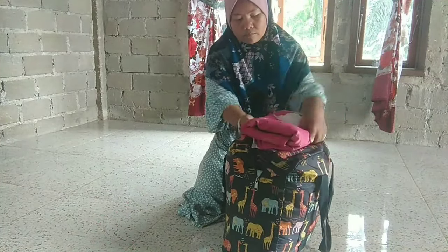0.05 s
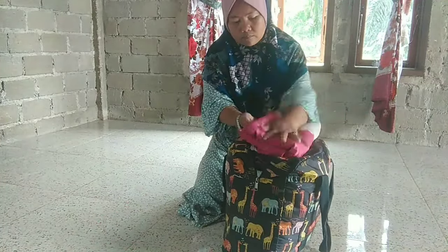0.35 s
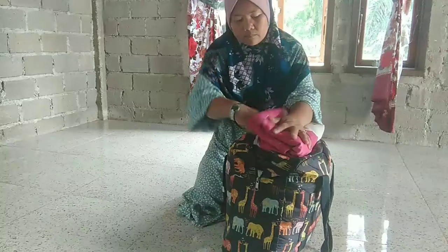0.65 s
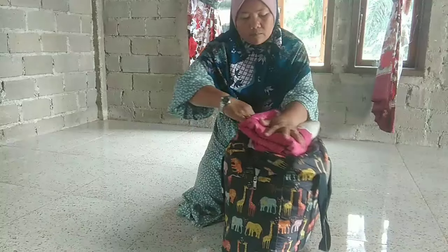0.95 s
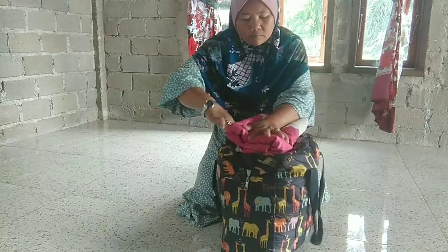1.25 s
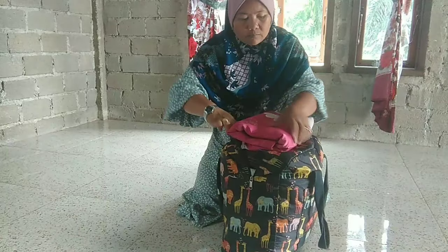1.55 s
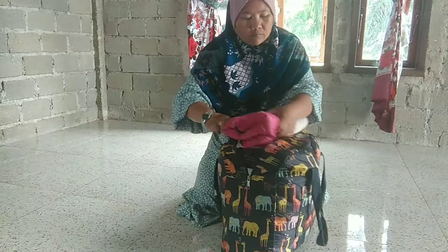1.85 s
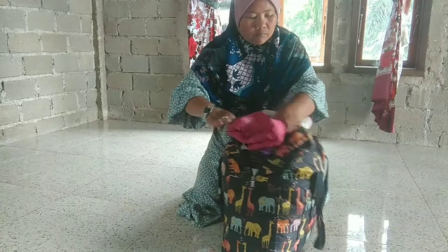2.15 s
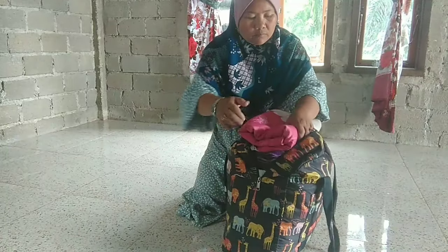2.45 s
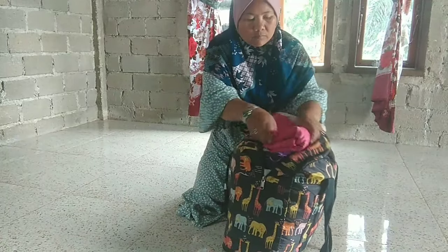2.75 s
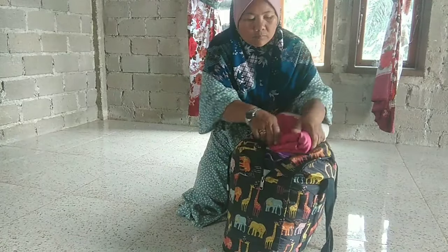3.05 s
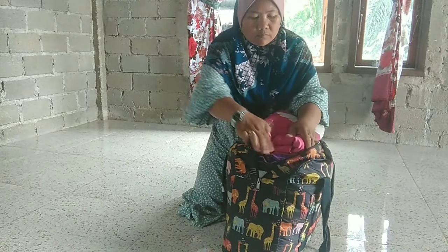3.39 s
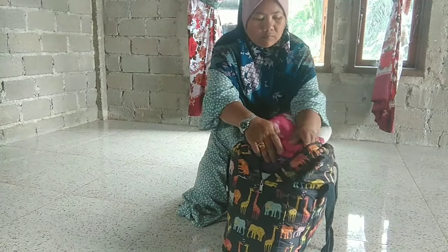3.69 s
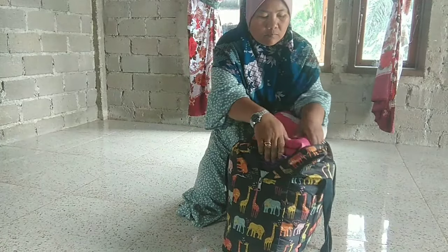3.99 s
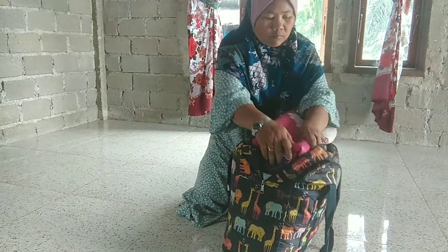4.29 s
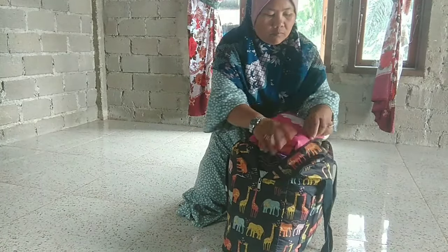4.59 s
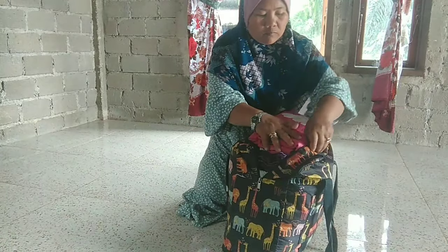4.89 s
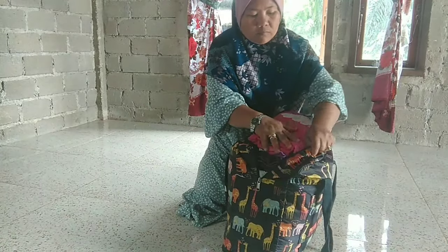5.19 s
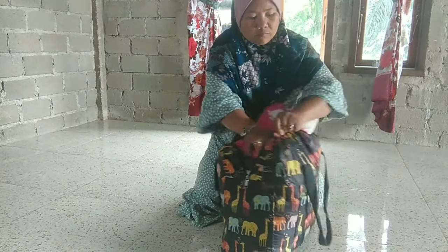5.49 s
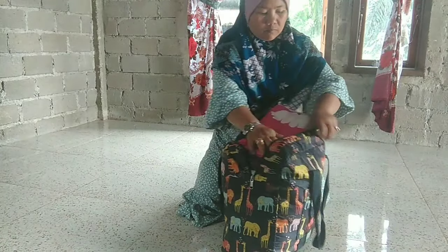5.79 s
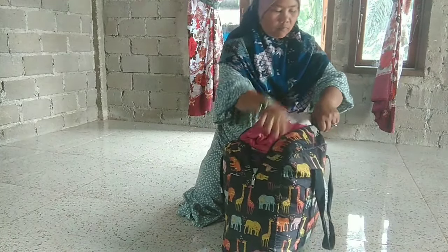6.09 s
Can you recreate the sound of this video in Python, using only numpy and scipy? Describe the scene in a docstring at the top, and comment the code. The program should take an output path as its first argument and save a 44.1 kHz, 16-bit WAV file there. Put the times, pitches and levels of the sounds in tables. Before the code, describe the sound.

Hands stuff clothes into a packed fabric bag, cloth sliding and scraping between dull pats and small clicks in a bare room.

```python
"""A swish of cloth and a soft thump: folded clothes are pressed by hand into a full fabric backpack.
Cloth slides in dense fibre slips, the stiff shell scrapes, and the stuffed bag resonates when pushed.
Zip pulls click, pats crush the creases and fingers tap the taut panels, over quiet air and a thin whine.
The bag stands on the tiled floor of a bare brick room, whose hard walls ring for half a second."""
import sys
import numpy as np
from scipy import signal
from scipy.fft import rfft, irfft
from scipy.io import wavfile
from scipy.ndimage import uniform_filter1d, map_coordinates

SR = 44100
rng = np.random.default_rng(int(sys.argv[2]) if len(sys.argv) > 2 else 0)


def wrap_up_sound(samples):
    """Save the sound to the file named by the first command line argument, as 16-bit audio."""
    columns = np.atleast_2d(samples).T
    # keep every value between -1 and 1, then stretch to whole-number steps
    tamed = np.clip(columns, -1, 1)
    steps = np.round(tamed * 32767).astype(np.int16)
    wavfile.write(sys.argv[1], SR, steps)


N = 279575
TIME = np.arange(N) / SR
# spectrum of coarse fabric as it scrapes or creases: frequency_hz, gain_db
COARSE_FABRIC_SPECTRUM = [(250, -15), (520, -29), (720, -3.5), (920, 0.5), (1250, -1), (1550, -5),
                          (1950, 2), (2400, -7), (3000, -10), (4000, -23), (12000, -44.5)]


def undb(db):
    """Decibels to amplitude ratio."""
    return 10 ** (np.asarray(db) / 20)


def unit(x):
    """Normalise to rms 1."""
    return x / np.sqrt(np.mean(x ** 2))


def convolve(x, response):
    """Linear filtering by an impulse response, keeping the sound's length."""
    return signal.fftconvolve(x, response)[:len(x)]


def colour(x, spectrum, size=4096):
    """Minimum-phase filtering to an outline of frequency_hz, gain_db."""
    hz, db = np.transpose(spectrum)
    gain = undb(np.interp(np.log(np.fft.rfftfreq(size, 1 / SR) + 1), np.log(hz), db))
    cepstrum = irfft(np.log(gain))
    cepstrum[1:size // 2] *= 2
    cepstrum[size // 2 + 1:] = 0
    return convolve(x, irfft(np.exp(rfft(cepstrum))))


def walk(rate_hz):
    """Random modulation: a smooth wander of rms 1."""
    step = max(int(SR / rate_hz), 1)
    stairs = np.repeat(rng.standard_normal(N // step + 1), step)
    return unit(uniform_filter1d(stairs, step)[:N])


def add(track, start_s, sound, peak_db):
    """Superposition: mix a sound in at a time and a peak level."""
    i = max(int(start_s * SR), 0)
    track[i:i + len(sound)] += (undb(peak_db) * sound / np.abs(sound).max())[:N - i]


def slips(per_s, scatter_db):
    """Stick-slip friction: tiny releases at random moments and of uneven size."""
    happens = rng.random(N) < per_s / SR
    size = undb(scatter_db * np.minimum(rng.exponential(size=N), 4))
    return unit(happens * size * rng.choice([-1, 1], N))


def shimmer(x, rate_hz, depth_db, bands, size=1024, loud_db=60):
    """Spectral modulation: narrow bands swell and fade at random, less deeply when the sound is loud."""
    hz, frame_s, spectra = signal.stft(x, SR, nperseg=size)
    place = np.meshgrid(rate_hz * frame_s, bands * np.sqrt(hz / hz[-1]))
    swell = map_coordinates(rng.standard_normal((len(frame_s), bands + 1)), place, order=3, mode="nearest")
    loudness = 1 + np.linalg.norm(spectra, axis=0) / undb(loud_db)
    gain = undb(depth_db * np.clip(swell, -2, 1.5) / np.sqrt(loudness))
    gain /= np.sqrt(np.mean(gain ** 2, axis=0))
    return signal.istft(spectra * gain, SR, nperseg=size)[1][:N]


def gestures(starts, rises, holds, levels, release_s, sag_db_per_s):
    """Incoherent addition: movements sum in power; each rises, sags while held, then dies away."""
    power = np.zeros(N)
    for start_s, rise_s, hold_s, level_db in zip(starts, rises, holds, levels):
        i = max(int(start_s * SR), 0)
        t = TIME[:min(N - i, int(.7 * SR))]
        attack = np.sin(np.pi / 2 * np.minimum(t / max(rise_s, 1 / SR), 1)) ** 2
        release = np.exp(-np.maximum(t - rise_s - hold_s, 0) / release_s)
        power[i:i + len(t)] += (attack * release * undb(level_db - sag_db_per_s * t)) ** 2
    return np.sqrt(power)


def hand_strokes():
    """Common excitation: a hand slides, slows a little and stops, driving swish, rasp and scrape."""
    # strokes over cloth: start_s, rise_s, hold_s, swish_db, rasp_re_swish_db, scrape_re_swish_db
    strokes = [ (0.0, 0.0013, 0.028, -46.5, -0.5, 0.5), (0.081, 0.022, 0.045, -52.5, -6, -0.5),
               (0.348, .005, 0.036, -49.5, 9, 11.5), (0.457, .02, .15, -54.5, -1, -15),
               (0.628, 0.03, 0.011, -46.5, -2, -13.5), (0.774, 0.011, 0.022, -76, -12, 6.5),
               (0.861, 0.029, .015, -74.5, -8, -3.5), (1.036, 0.012, 0.1, -61, -20, -27),
               (1.128, 0.08, .06, -52, -5, -18.5), (1.46, 0.0071, .012, -62, -17, -8),
               (1.485, 0.025, .17, -62.5, -17.5, -25), (1.628, 0.023, 0.032, -68.5, 7.5, -13),
               (1.765, 0.038, 0.037, -56.5, -6, -2.5), (1.836, .002, 0.0066, -42.5, -9.5, -3),
               (1.93, 0.036, .05, -70, -23, -6.5), (2.12, .01, 0.065, -55, 3, -0.5),
               (2.217, .02, 0.041, -59, -9, -5), (2.317, .015, 0.016, -77.5, -4, -3),
               (2.374, 0.013, .04, -77.5, -0.5, 5), (2.547, .006, 0.044, -59.5, -27, -13),
               (2.597, 0.07, 0.38, -60.5, -19, -12), (2.665, 0.017, 0.017, -71.5, -4, -3),
               (2.833, 0.099, 0.03, -53.5, -3.5, 5.5), (3, .02, 0.066, -62, -11, -6),
               (3.065, .025, 0.011, -47, -18, -9.5), (3.145, 0.021, 0.073, -49.5, -6, -7.5),
               (3.288, 0.04, .02, -52, -7, -3.5), (3.357, 0.029, 0.027, -52.5, -10, -8),
               (3.436, 0.042, 0.19, -57.5, -18, -16), (3.53, .012, .012, -62, 2, 5),
               (3.583, .015, 0.059, -54.5, -12, 1.5), (3.67, .02, 0.23, -59, -18, -10),
               (3.758, 0.013, 0.01, -59.5, 2, 2), (3.877, 0.068, 0.04, -49, -6.5, -8),
               (4.053, 0.055, 0.07, -54, -9, -16.5), (4.19, 0.0066, 0.062, -59.5, -26, 0),
               (4.238, 0.043, 0.12, -59, -20, -16), (4.42, 0.039, .01, -57, -21, -17),
               (4.477, .03, 0.013, -49, -14, -8.5), (4.51, .05, 0.049, -54.5, -15, -4),
               (4.633, 0.029, 0.25, -61, -28, -20.5), (4.923, .025, .015, -61, -12, -9),
               (5.02, 0.071, 0.025, -47, -2, -11.5), (5.122, .02, 0.095, -57, -3, -13),
               (5.265, .005, .06, -48.5, 4.5, -1), (5.313, 0.1, 0.081, -39.5, -3, -6.5),
               (5.56, 0.075, 0.4, -45.5, -4.5, -6), (5.637, 0.023, 0.012, -46.5, -7, -2.5),
               (5.92, .035, .02, -47, -12, -26), (6.019, .05, 0.064, -45, -5.5, -6.5),
               (6.161, 0.042, 0.083, -58, -19, -39.5), (6.27, 0.063, .02, -45, -14.5, -28)]
    start_s, rise_s, hold_s, swish_db, rasp_db, scrape_db = np.transpose(strokes)
    return [gestures(start_s, rise_s, hold_s, swish_db + share_db, release_s=0.034, sag_db_per_s=9)
            for share_db in (0, rasp_db, scrape_db)]


def cloth_swish(speed, pressure):
    """Sliding friction of weave on weave: speed releases more fibres, pressure adds a coarser rasp."""
    # spectra of sliding fibres and of pressed weave: frequency_hz, gain_db
    swish_spectrum = [(1500, -36.5), (3800, -34.5), (5000, -7.5), (6200, -2), (7100, 1.5), (8100, 3.5),
                      (9200, 0), (10200, -7.5), (12000, -12), (15000, -36.5)]
    rasp_spectrum = [(1000, -28.5), (2000, -8), (2900, 1.5), (3500, -1), (4700, 0.5), (6000, -0.5),
                     (9000, -15), (12000, -21.5), (15000, -28)]
    fibres = slips(per_s=1200 + 7000 * np.sqrt(speed / speed.max()), scatter_db=-1.5)
    swish = unit(colour(fibres, swish_spectrum)) * speed * undb(-0.5)
    weave = unit(colour(slips(per_s=3000, scatter_db=2.0), rasp_spectrum))
    rasp = shimmer(weave, rate_hz=13, depth_db=2.5, bands=48) * pressure * undb(-1.2)
    return (swish + rasp) * undb(0.69 * walk(70))


def shell_scrape(drag):
    """Stick-slip on a rough surface: the coarse shell catches in fewer, larger slips."""
    catches = unit(colour(slips(per_s=900, scatter_db=2.5), COARSE_FABRIC_SPECTRUM))
    scrape = shimmer(catches, rate_hz=25, depth_db=1.5, bands=40)
    return scrape * drag * undb(-2.5 + 1.5 * walk(45))


def stuffing_shoves(width_hz=85):
    """Membrane resonance: packed clothes give way and ring the fabric wall at a pitch set by tension."""
    # shoves of the packed clothes: start_s, hold_s, level_db, pitch_hz
    shoves = [ (0.0, .012, -28, 186), (.085, 0.025, -54.5, 196), (.351, .025, -27, 228),
              (0.424, .04, -44, 230), (0.635, .04, -65, 380), (1.185, .02, -68.5, 335),
              (1.456, .02, -66.5, 220), (1.785, .05, -60, 238.8), (1.834, 0.028, -54, 131.5),
              (2.098, .015, -50, 258.7), (2.118, .035, -41.5, 220), (2.234, .02, -47.5, 205),
              (2.401, .06, -62.5, 248), (2.557, .055, -61.5, 220), (2.756, .02, -69, 170),
              (2.927, .04, -57, 186), (3.147, 0.068, -58, 310), (3.31, .03, -64, 253),
              (3.379, 0.012, -69.5, 157.3), (3.465, .05, -64, 360), (3.588, 0.028, -57.5, 400),
              (3.638, .02, -54, 220), (3.75, .06, -66, 278.5), (3.899, 0.071, -61, 205),
              (3.993, 0.043, -71, 382), (4.172, 0.083, -53.5, 301), (4.274, 0.046, -61, 211),
              (4.532, 0.056, -57.5, 200), (4.885, 0.034, -64, 350), (5.13, 0.094, -62, 295),
              (5.27, .12, -48.5, 230), (5.421, .04, -49.5, 266), (5.602, .03, -57.5, 217.3),
              (5.674, 0.038, -47.5, 206.4), (5.78, .06, -56, 320), (6.037, .02, -50.5, 339.5),
              (6.095, 0.0274, -59, 253.4)]
    # dull spectrum of the flexing bag: frequency_hz, gain_db
    flex_spectrum = [(30, -46), (70, -27), (115, 1), (160, -11.5), (225, 6.5), (290, -10), (380, -3.5),
                     (520, -13), (900, -25.5), (2500, -39.5)]
    start_s, hold_s, level_db, pitch_hz = np.transpose(shoves)
    rise_s = 0.017 * 2 ** ((-56 - level_db) / 11.5)  # halves for every 11.5 dB more force
    force = gestures(start_s, rise_s, hold_s, level_db, release_s=0.021, sag_db_per_s=25)
    wall_hz = np.interp(TIME, start_s + rise_s + hold_s / 2, pitch_hz)
    carrier = np.exp(2j * np.pi * np.cumsum(wall_hz) / SR)
    jerks = slips(per_s=450, scatter_db=0.5)
    # shift down, low-pass, shift back: a narrow resonance that travels with the pitch
    lowpass = signal.butter(2, width_hz / 2, fs=SR, output="sos")
    ring = (signal.sosfilt(lowpass, jerks / carrier) * carrier).real
    flex = colour(jerks, flex_spectrum)
    return undb(-5) * (unit(ring) + unit(flex)) * force


def background(whine_hz=7660, whine_db=-77, air_db=-77):
    """Broadband and narrowband noise: quiet air and a thin, wavering whine."""
    # spectrum of the room's air: frequency_hz, gain_db
    air_spectrum = [(25, -11.5), (100, 7), (200, -5), (400, -7.5), (900, -17.5), (3000, -21), (5500, -20),
                    (7700, -7.5), (10000, -17), (15000, -49.5)]
    phase = 2 * np.pi * whine_hz * TIME
    whine = unit(walk(260) * np.cos(phase) + walk(240) * np.sin(phase))
    waver = undb(4.5 * walk(16))
    air = unit(colour(rng.standard_normal(N), air_spectrum))
    return undb(air_db) * air + undb(whine_db) * whine * waver


def blows(events, modes, detune, rise_s):
    """Modal response to a force pulse: longer contact is duller, and tauter fabric rings higher."""
    out, t = np.zeros(N), TIME[:SR // 3]
    tunings = 1 + detune * rng.standard_normal((len(events), len(modes)))
    for (start_s, level_db, contact_ms, pitch_ratio), tuning in zip(events, tunings):
        ring = np.zeros(len(t))
        for (hz, mode_db, t60_s), stretch in zip(modes, tuning):
            decay = np.exp(-np.log(1000) * t / t60_s)
            ring += undb(mode_db) * np.cos(2 * np.pi * hz * pitch_ratio * stretch * t) * decay
        onset = 1 - np.exp(-t / rise_s)
        push = np.sin(np.pi * np.minimum(1000 * t / contact_ms, 1)) ** 2
        add(out, start_s, convolve(ring * onset, push), level_db)
    return out


def bag_thumps():
    """Damped vibration: a push excites the low modes of the whole stuffed bag."""
    # pushes on the bag: start_s, level_db, contact_ms, pitch_ratio
    pushes = [(.005, -33.5, 3.5, 1.0), (.3545, -19, 2.3, 1.02), (.368, -22, 2.1, 1.024),
              (.395, -32, 2.4, 1.63), (.79, -58, 1.5, 1.04), (1.07, -60, 6.7, 0.4),
              (1.466, -57.5, 0.65, 1.3), (2.128, -34.5, 0.79, 1.56), (2.140, -38, 0.66, 0.83),
              (2.425, -57.5, 1.7, 1.21), (2.553, -52, 2.4, 1.22), (3.659, -52, 0.53, 1.23),
              (4.20, -51, 0.41, 1.55), (4.222, -47, 4.2, 0.95), (5.284, -39, 1.2, 1.15),
              (5.303, -34.5, 1.7, 1.02), (5.383, -37, 2.5, 0.48), (5.684, -42, 0.47, 1.01),
              (5.705, -43, 0.72, 1.07)]
    # modes of the bag: frequency_hz, level_db, t60_s
    bag_modes = [(114.9, -3, 0.28), (216.6, 7.5, 0.097), (344, -9.5, 0.037), (402, -11, 0.035),
                 (662, -8, 0.07)]
    return undb(1) * blows(pushes, bag_modes, detune=0.004, rise_s=0.0004)


def zip_clicks(rattle_db=-19):
    """Impulse excitation: zip pulls and seams click, and fabric damps the rattle in milliseconds."""
    # zip pulls and snapping seams: start_s, peak_db, ring_ms
    clicks = [(0.039, -47, 2), (0.133, -40, 1.8), (0.3538, -17, 2), (0.365, -56, 1.3), (0.3808, -36, 2.7),
              (1.8404, -11, 2.2), (2.129, -25.5, 0.41), (2.2346, -40, 1), (2.551, -66, 1.6),
              (3.603, -43, .5), (5.27, -20, 1.1), (5.3033, -30, 0.51), (5.978, -26, 4.1),
              (6.13, -26.5, 2.1)]
    # bright spectrum of a click: frequency_hz, gain_db
    click_spectrum = [(200, -25.5), (1000, -18), (2000, -13), (3300, -15.5), (4800, -2.5), (7900, 5),
                      (9500, -3), (12500, -23.5), (15000, -57.5)]
    out, t = np.zeros(N), TIME[:SR // 20]
    for start_s, peak_db, ring_ms in clicks:
        rattle = rng.standard_normal(len(t)) * np.exp(-1000 * t / ring_ms)
        add(out, start_s, colour((t == 0) + undb(rattle_db) * rattle, click_spectrum), peak_db)
    return out


def crease_crackle():
    """Crumpling noise: a pat flattens many creases at once, in a fading burst of slips."""
    # hard pats on loose fabric: start_s, peak_db, fade_ms
    pats = [(0.354, -18, 1.12), (0.357, -33, 33), (2.13, -38, 63), (5.303, -25, 16)]
    out, t = np.zeros(N), TIME[:SR // 5]
    creases = colour(slips(per_s=4800, scatter_db=12.0), COARSE_FABRIC_SPECTRUM)
    for start_s, peak_db, fade_ms in pats:
        burst = creases[int(start_s * SR):][:len(t)]
        add(out, start_s, burst * np.exp(-1000 * t / fade_ms), peak_db)
    return out


def panel_taps():
    """Membrane modes: a finger flicks a taut panel, which rings high and briefly."""
    # finger flicks: start_s, peak_db, contact_ms, pitch_ratio
    flicks = [(.355, -35, 0.17, 1.5), (.786, -46.5, 0.88, 0.93), (.800, -48, 0.9, 1.09),
              (1.024, -59, 0.69, 1.36), (1.8405, -28, 0.5, 1.03), (1.844, -31.5, 1.33, 1.28),
              (1.985, -46.5, 1.05, 0.98), (2.106, -40, 0.85, 0.99), (2.129, -27, 0.49, 0.85),
              (2.141, -29.5, 0.64, 0.7), (3.602, -35.5, 0.9, 1.3), (3.624, -38.5, 0.53, 1.49),
              (3.643, -44, 0.54, 0.95), (4.199, -36.5, 0.74, 0.88), (4.212, -35.5, 0.95, 0.59),
              (5.3032, -20, 0.24, 1.02), (5.320, -31.5, 0.42, 0.67), (5.450, -26.5, 1.56, 1.15)]
    # modes of a panel: frequency_hz, level_db, t60_s
    panel_modes = [(600, -10, 0.013), (881, 4.5, 0.015), (1020, -2, 0.012), (1400, -1.5, 0.0053),
                   (2010, 4.5, 0.01), (2900, 5, 0.016)]
    return blows(flicks, panel_modes, detune=0.099, rise_s=0.00081)


def room_response(tail_start_s=0.0042, build_s=0.012):
    """Reverberation: direct sound, first reflections, then a dense tail with its own decay per band."""
    # first reflections off the tiles and the body: delay_ms, gain_db
    reflections = [(1.0, -17.5), (2.7, -26), (5.8, -18.5)]
    # reverberant tail: frequency_hz, t60_s, level_re_direct_db
    tail_bands = [(60, 0.61, 2), (105, 0.43, -3.5), (220, 0.29, -12), (560, 0.34, -2.5), (1500, 0.36, -11),
                  (3900, 0.46, -12), (7980, 0.42, -12), (14000, 0.22, -8)]
    t = TIME[:SR]
    response = 1. * (t == 0)
    for delay_ms, gain_db in reflections:
        response[int(delay_ms * SR / 1000)] += undb(gain_db)
    hz, t60s, levels = np.transpose(tail_bands)
    noise = rfft(rng.standard_normal(SR))
    band_place = np.interp(np.log(np.arange(len(noise)) + 1), np.log(hz), np.arange(len(hz)))
    build = np.clip((t - tail_start_s) / build_s, 0, 1)
    for k, (t60_s, level_db) in enumerate(zip(t60s, levels)):
        band = irfft(noise * np.maximum(1 - np.abs(band_place - k), 0))
        fade = build * np.exp(-np.log(1000) * t / t60_s)
        response += undb(level_db) * fade / np.linalg.norm(fade) * band
    return response


def scene(thump_room_db=-3):
    """Superposition: rubbing, thumps, taps and clicks all come from the bag and share one room."""
    walls = room_response()
    speed, pressure, drag = hand_strokes()
    rubbing = cloth_swish(speed, pressure) + shell_scrape(drag) + stuffing_shoves()
    rustle = shimmer(convolve(rubbing, walls), rate_hz=11, depth_db=6.4, bands=105, loud_db=-58)
    thumps = bag_thumps()
    # the broad front of the bag faces the listener, so its thumps are drier than the rest
    thump_reverb = undb(thump_room_db) * (convolve(thumps, walls) - thumps)
    transients = convolve(panel_taps() + crease_crackle() + zip_clicks(), walls)
    return (rustle + thumps + thump_reverb + transients + background())[None]


def record(dry, low_hz=72, top_hz=15450):
    """Band limiting: a high-pass thins the deep bass and a steep low-pass cuts the top."""
    thin = signal.sosfilt(signal.butter(3, low_hz, "highpass", fs=SR, output="sos"), dry)
    return signal.sosfilt(signal.ellip(10, .2, 70, top_hz, fs=SR, output="sos"), thin)


dry = scene()
out = record(dry)
wrap_up_sound(out)
```